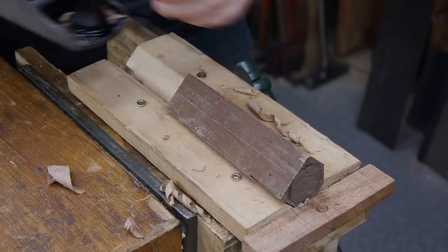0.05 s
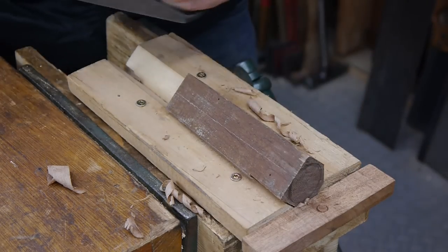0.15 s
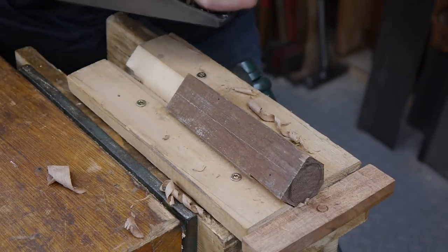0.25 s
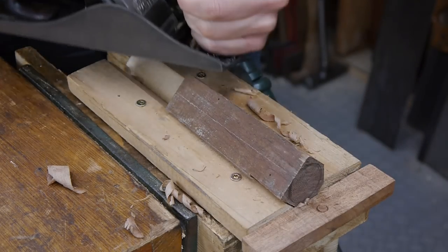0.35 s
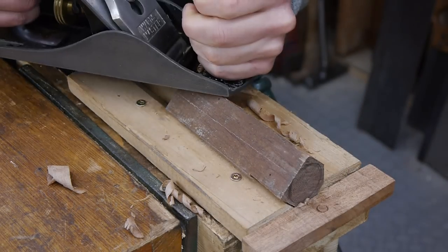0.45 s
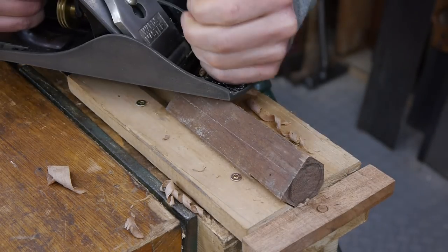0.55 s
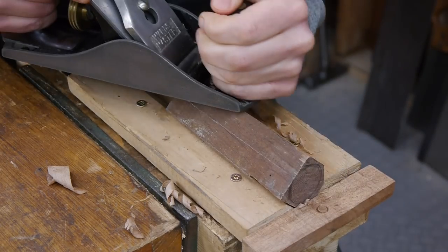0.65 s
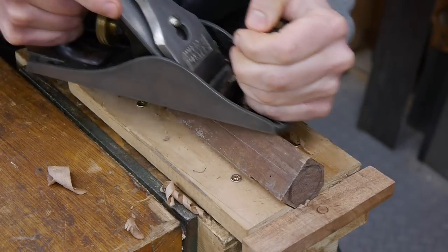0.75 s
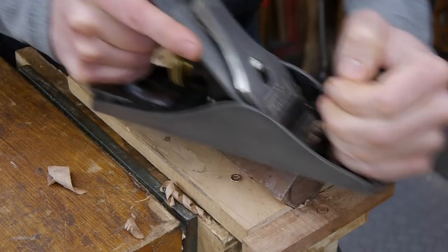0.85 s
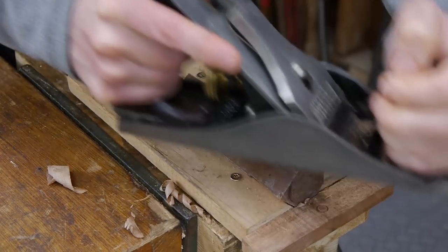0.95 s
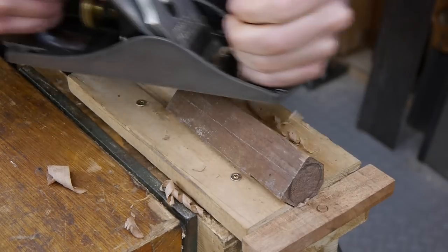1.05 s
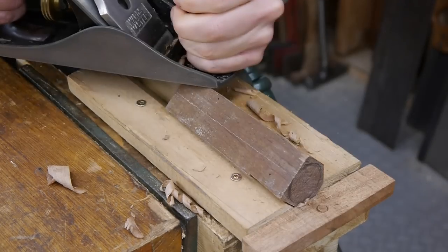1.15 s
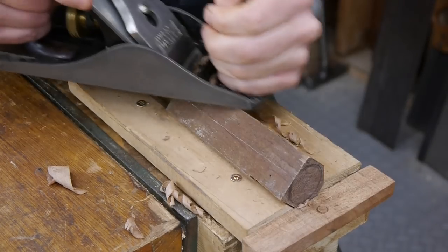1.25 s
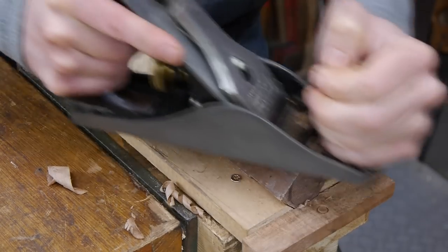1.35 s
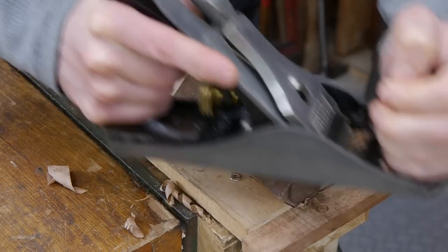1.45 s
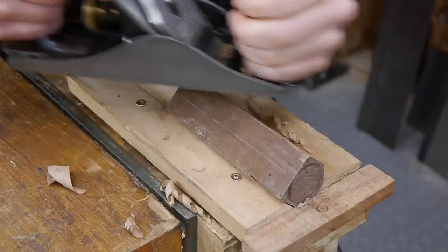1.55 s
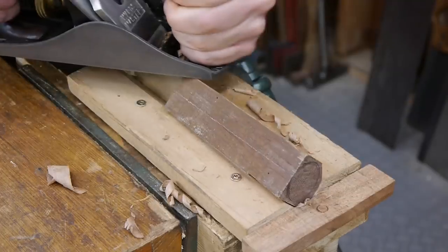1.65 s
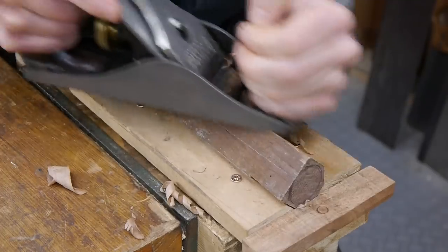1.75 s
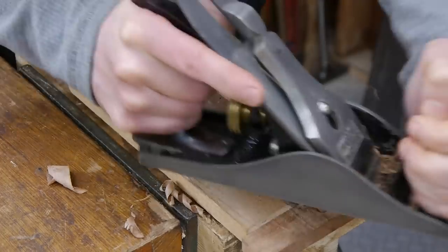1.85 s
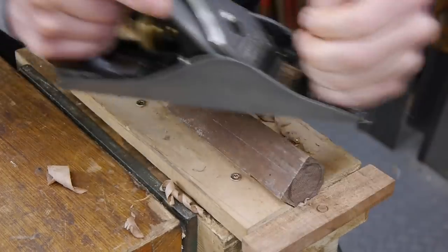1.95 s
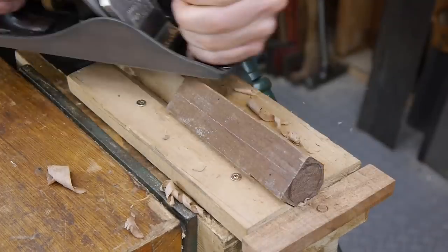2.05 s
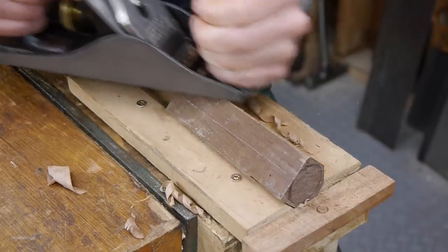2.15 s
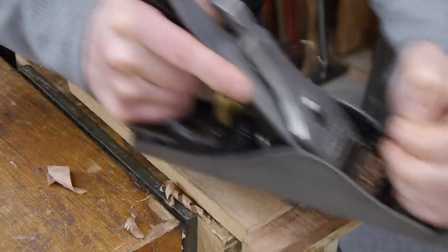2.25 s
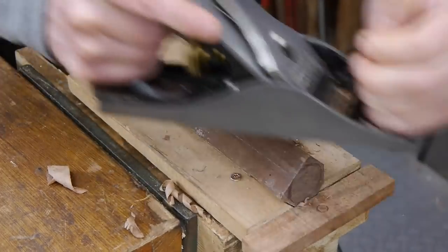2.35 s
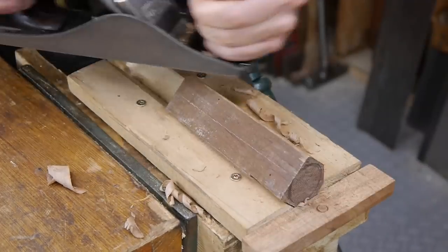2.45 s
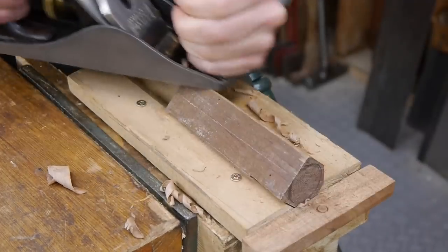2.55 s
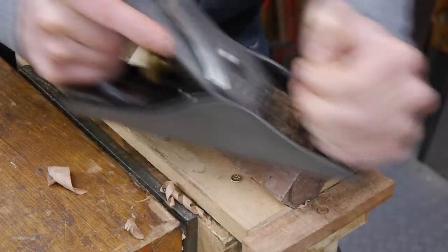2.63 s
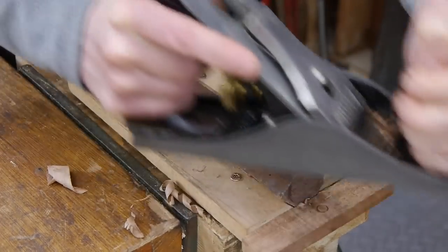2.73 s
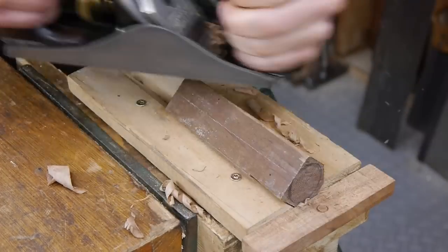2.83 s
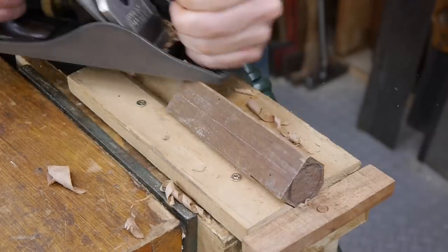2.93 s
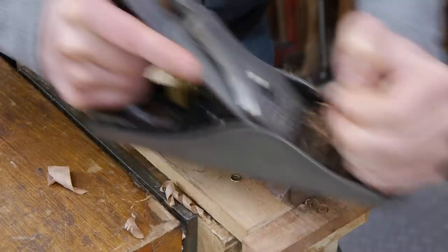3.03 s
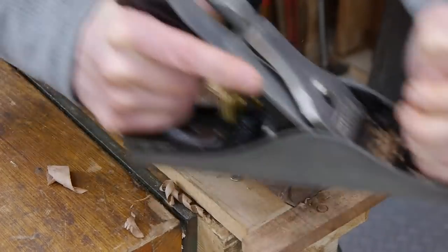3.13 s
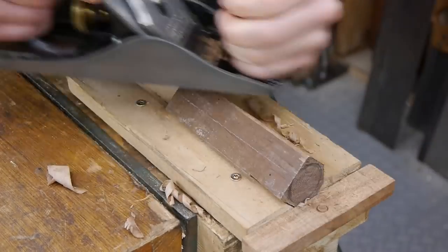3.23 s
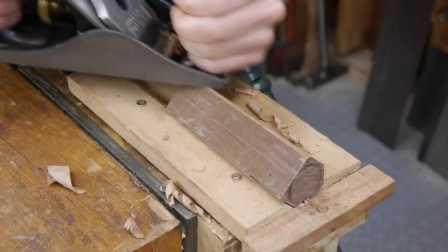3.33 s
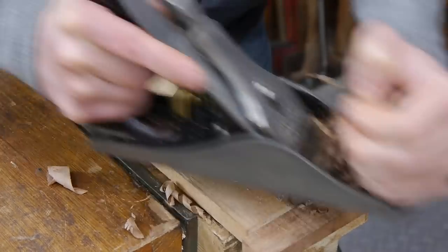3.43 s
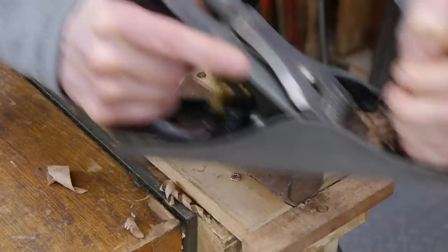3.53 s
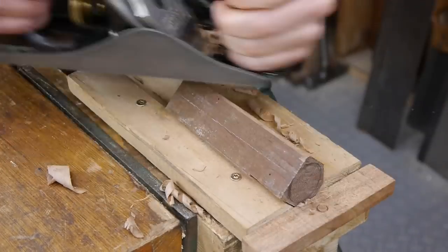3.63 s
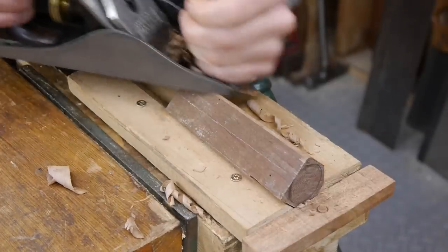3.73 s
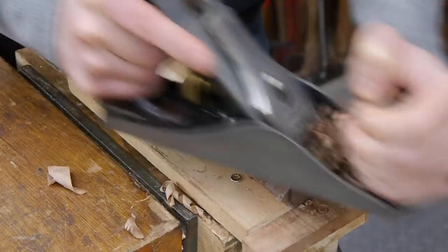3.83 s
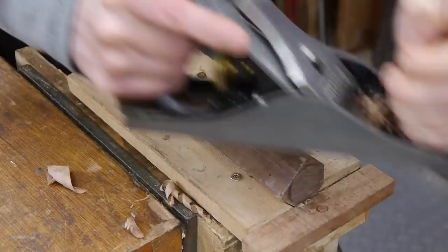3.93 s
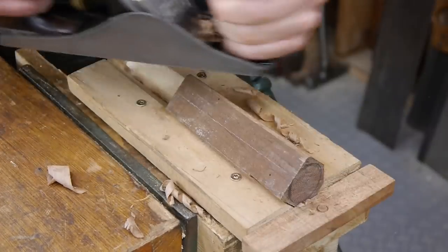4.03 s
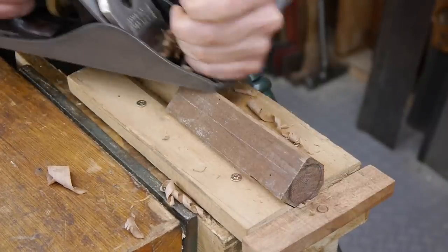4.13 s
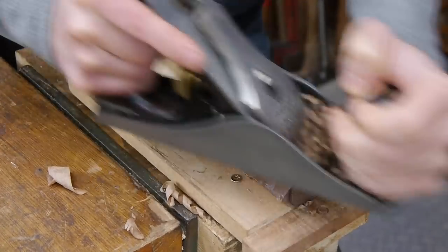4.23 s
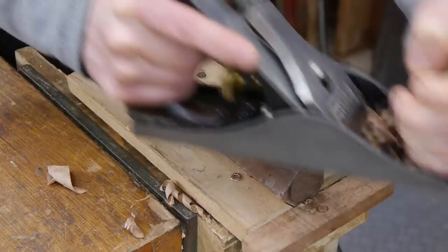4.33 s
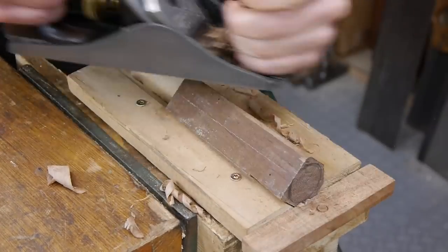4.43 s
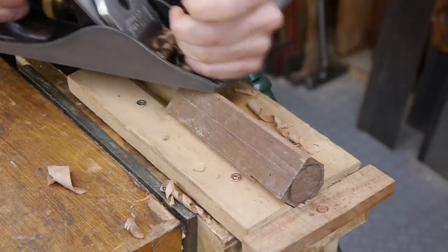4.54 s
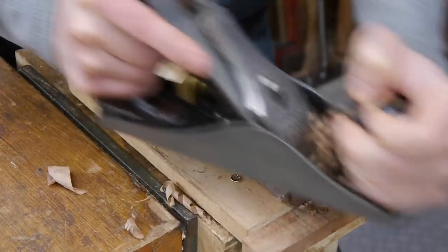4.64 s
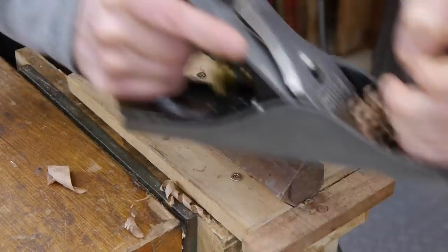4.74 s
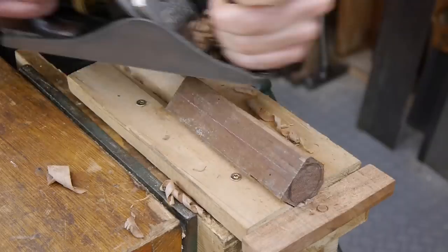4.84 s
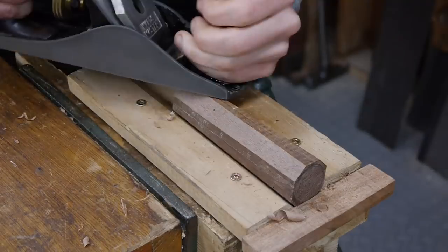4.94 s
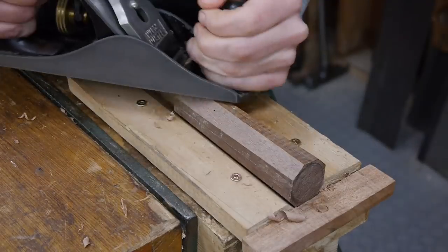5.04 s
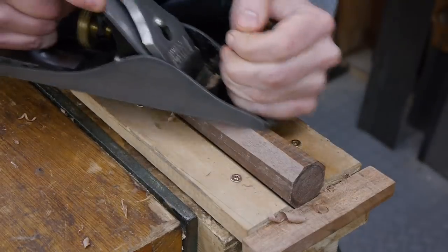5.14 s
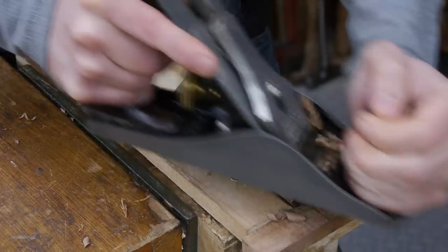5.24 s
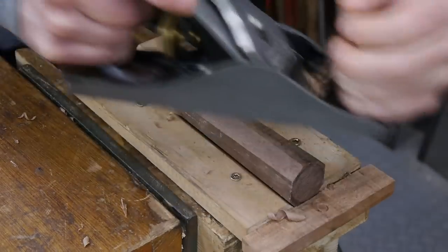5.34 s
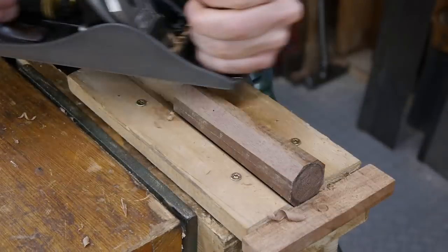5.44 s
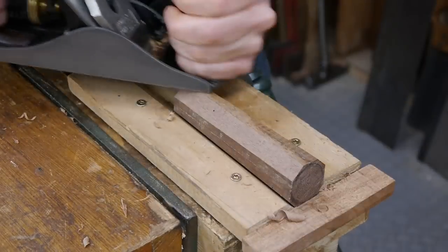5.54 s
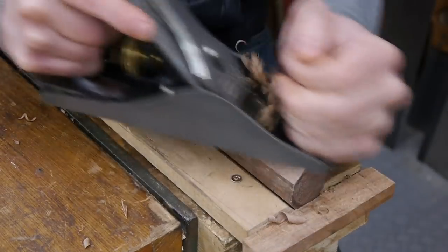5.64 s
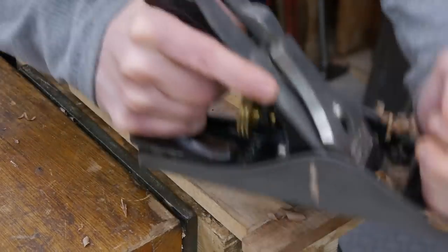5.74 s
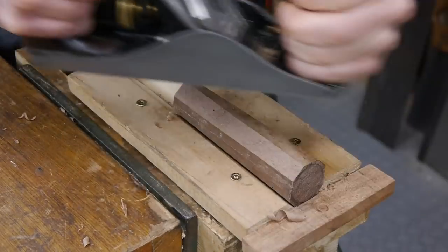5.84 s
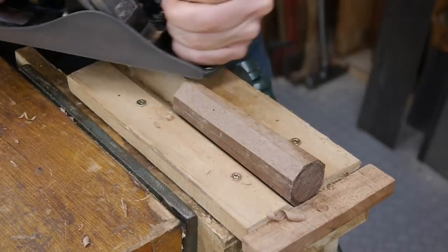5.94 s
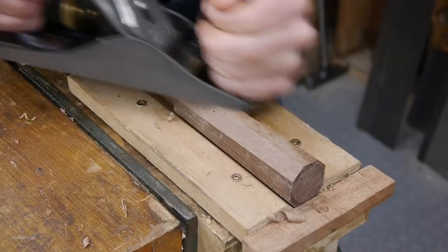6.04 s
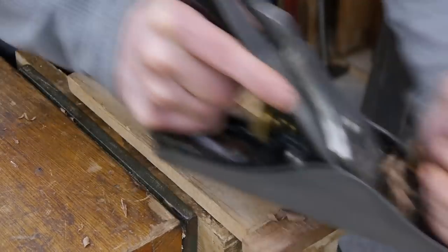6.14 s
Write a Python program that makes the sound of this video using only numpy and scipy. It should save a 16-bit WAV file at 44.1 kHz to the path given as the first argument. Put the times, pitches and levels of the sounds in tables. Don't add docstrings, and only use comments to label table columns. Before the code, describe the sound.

Quick hand-planing on hardwood: iron clack, light slide, hard knock, brief tearing scrape, then the blank rattles back into its wooden jig.

```python
import sys
import numpy as np
from scipy import signal
from scipy.fft import rfft, irfft, next_fast_len
from scipy.io import wavfile
from scipy.ndimage import uniform_filter1d

SR = 44100
rng = np.random.default_rng(int(sys.argv[2]) if len(sys.argv) > 2 else 0)


def level_to_linear(level):
    exponent = np.asarray(level, float) / 20
    return 10 ** exponent


def persist_wave(psi):
    counts = np.round(np.clip(psi, -1, 1) * 32767).astype(np.int16)
    wavfile.write(sys.argv[1], SR, np.atleast_2d(counts).T)


N = 272538


def at_hz(points, hz):
    point_hz, value = np.transpose(points)
    return np.interp(np.log(hz + 1e-9), np.log(point_hz), value)


def shaped(x, points):
    n = x.shape[-1]
    size = next_fast_len(n)
    gain = level_to_linear(at_hz(points, np.fft.rfftfreq(size, 1 / SR)))
    return irfft(rfft(x, size) * gain, size)[..., :n]


def drift(rate):
    steps = rng.standard_normal(4000)
    return np.interp(np.arange(N) / SR * rate, np.arange(len(steps)), steps)


# f/Hz, level/dB per Hz
AIR = [(12, -18), (20, -5), (48, -5), (86, -11.5), (660, -3), (718, -5.5), (849, -5.5), (3950, -13.5),
       (6720, -18), (13500, -14), (16000, -13.5)]
# f/Hz, side over mid level/dB
HUSH_SIDE = [(60, -5), (500, -11), (3000, -1)]
# t/s, level/dB
HUSH_SWELL = [(.25, 2), (.3, -1), (.42, 4), (.49, -2.5), (.62, 0), (.72, 3.7)]


def hush():
    noise = shaped(rng.standard_normal((2, N)), AIR)
    swell_db = np.interp(np.arange(N) / SR, *np.transpose(HUSH_SWELL))
    mid, side = noise / np.std(noise) * level_to_linear(-63 + 1.6 * drift(12) + swell_db)
    return mid, shaped(side, HUSH_SIDE)


# t/s, peak level/dB, thump level/dB, edge level/dB, brightness level/dB
JOLTS = [
    (0.224, -61, -5, 12, 9),
    (0.9146, -17.5, -44, -12, -25),
    (1.2218, -20.5, -10.5, -22, -22),
    (1.73, -7.5, -17.5, -16.5, -26),
    (1.8337, -16.5, -26, 2.5, -28.5),
]


def jolts():
    rattle_ms = 2.8
    return [(*row, rattle_ms) for row in JOLTS]


# t/s, peak level/dB, brightness level/dB, slide level/dB,
# slide hiss level/dB
LANDINGS = [(0.5104, -33.5, -13, -58, -81), (1.1781, -16, 0.5, -41, -63), (1.6859, -20, 7, -35, -60),
            (2.1449, -21, 7.5, -37, -58.5), (2.5723, -17.5, 4.7, -37.5, -55), (2.9601, -16, 3, -33, -49.5),
            (3.3591, -13.5, -2, -35.5, -50), (3.7485, -15.5, -0.5, -31.5, -52),
            (4.159, -11.5, 0.5, -35.5, -54.5), (4.567, -17, -1, -35.5, -50.5),
            (4.9762, -23, 20, -46.5, -64.5), (5.0711, -17, -10.5, -43, -63), (5.554, -19, -0.5, -39, -60),
            (6.0227, -15, 5.5, -38.5, -55.5)]
# thump level/dB, edge level/dB
FOOTINGS = [(-5.5, -2.5), (-16.5, 2.5), (-5.5, 9), (-2.5, 10), (-9, 5), (-9, 5.8), (-7.5, 5), (-8.5, 4),
            (-12, 5), (-6.5, 8.5), (-8.5, 3.5), (-5, -19), (-16.5, -3.5), (-10, 3.5)]


def landings():
    rattle_ms = 3.63
    return [(s, peak_db, *footing, bright_db, rattle_ms)
            for (s, peak_db, bright_db, *_), footing in zip(LANDINGS, FOOTINGS)]


def sliding():
    t, out = np.arange(N) / SR, np.zeros((3, N))
    stops = np.sort([row[0] for row in CUTS + LANDINGS])
    for s, _, _, slide_db, hiss_db in LANDINGS:
        start, stop = s + .012, stops[stops > s][0] + .006
        on = (t >= start) & (t < stop)
        skid_db = 13.5 * np.exp(-(t[on] - start) / .0061)
        run_up_db = 20.5 * np.exp((t[on] - stop) / .02)
        blank_db = slide_db + skid_db
        out[:, on] += level_to_linear([blank_db, blank_db - 7, hiss_db + .5 * skid_db + run_up_db])
    return out


def shudder():
    push = uniform_filter1d(cutting()[0] + rubbing()[0], size=900)
    low_pass = signal.butter(3, 100.7, fs=SR, output="sos")
    low = signal.sosfilt(low_pass, rng.standard_normal((2, N)))
    mid, side = low / np.std(low) * level_to_linear(-55.5 + 3.5 * drift(14)) * np.abs(push) ** 0.77
    return mid, level_to_linear(-10.5) * side


# t/s, length/s, scrape level/dB at entry, scrape level/dB at exit, hiss level/dB at exit
CUTS = [(0.703, 0.22, -38.5, -29, -37.5), (1.309, 0.12, -22, -20.5, -35.5), (1.781, 0.084, -20, -20, -28.5),
        (2.222, 0.062, -16, -22, -21.5), (2.645, .075, -31.5, -24.5, -26), (3.031, 0.078, -19, -28.5, -30),
        (3.428, 0.071, -21, -23.5, -25.5), (3.819, 0.081, -17, -18.5, -28), (4.227, 0.077, -15.5, -28, -26),
        (4.632, 0.076, -26, -21, -24.5), (5.139, 0.064, -31, -27, -34.5),
        (5.214, 0.093, -18.5, -18.5, -31.5), (5.644, .1, -23, -22, -27.5), (6.107, 0.077, -30, -14.5, -24)]
# hiss gain entry to exit/dB, rasp level/dB, rumble level/dB, attack/ms
SHAVINGS = [(21, -31, -44.5, 9), (7, -27.5, -38, 15.3), (8, -22, -40, 3.2), (9.5, -18, -38.5, 4.9),
            (6, -21.5, -39, 9.8), (-7, -26, -36.5, 7.6), (-1.5, -21.5, -41, 5.1), (-1.5, -23, -37, 7.8),
            (3.5, -19.5, -38, 9), (1, -21, -40.5, 7.2), (25, -30.5, -34.5, 6.7), (-4.5, -26, -36, 3.3),
            (3, -20, -35, 4.9), (2.5, -20.5, -34.5, 4)]
RELEASE_DB_PER_S = {"scrape": 503, "rumble": 397.5, "hiss": 559, "rasp": 691}


def cutting():
    t, out = np.arange(N) / SR, np.zeros((4, N))
    for cut, shaving in zip(CUTS, SHAVINGS):
        s, length, entry_db, exit_db, hiss_exit_db = cut
        gain_db, rasp_exit_db, rumble_db, attack_ms = shaving
        on = (t >= s) & (t < s + length + .2)
        age = t[on] - s
        done, after = np.clip(age / length, 0, 1), np.maximum(age - length, 0)
        entry_kick_db = 7 * np.exp(-age / .015)
        exit_kick_db = 11.5 * np.exp(-((age - length) / .0055) ** 2)
        arch_db = 2.5 * np.sin(np.pi * done)
        to_come_db = gain_db * (1 - done)
        scrape_db = entry_db + (exit_db - entry_db) * done
        bench_db = rumble_db + entry_kick_db + exit_kick_db
        hiss_db = hiss_exit_db - to_come_db + arch_db
        rasp_db = rasp_exit_db - 0.93 * to_come_db + arch_db
        attack = np.minimum(age * 1000 / attack_ms, 1)
        held_db = (scrape_db, bench_db, hiss_db, rasp_db)
        for k, (db, fall) in enumerate(zip(held_db, RELEASE_DB_PER_S.values())):
            out[k, on] += level_to_linear(db - fall * after) * attack
    return out


# t/s, length/s, f/Hz, level/dB
CHATTER = [
    (0.77, 0.038, 520, -27.5),
    (1.868, 0.0067, 1558, -4),
    (3.909, 0.012, 500, -24.5),
]


def chatter():
    t, wobble = np.arange(N) / SR, np.cumsum(1 + 0.013 * drift(130)) / SR
    out = np.zeros(N)
    for s, length, hz, db in CHATTER:
        swell = np.exp(-((t - s) / length * 2) ** 2)
        out += level_to_linear(db) * swell * np.sin(2 * np.pi * hz * wobble)
    return out


# t/s, peak level/dB, rocking level/dB
DROPS = [(0.9854, -19, -31), (1.502, -17, -34.5), (1.9305, -18.5, -32.5), (2.3558, -17.5, -35),
         (2.7706, -17, -33), (3.165, -12.5, -21.5), (3.5499, -7, -20), (3.962, -21, -29.5),
         (4.365, -18.5, -34), (4.7576, -11, -25.5), (5.3342, -15, -22.5), (5.7968, -8.5, -17.5)]


def drops():
    thump_db, edge_db, bright_db, rattle_ms = -25, -28, -26, 3.45
    return [(s, peak_db, thump_db, edge_db, bright_db, rattle_ms) for s, peak_db, _ in DROPS]


def rocking():
    t, out = np.arange(N) / SR, np.zeros((3, N))
    share_db = np.array([[0], [-9.5], [-26.5]])
    for s, _, rock_db in DROPS:
        on = (t >= s - .005) & (t < s + .2)
        out[:, on] += level_to_linear(rock_db - 322 * (t[on] - s) + share_db)
    return out


def rubbing():
    return uniform_filter1d(sliding() + rocking(), size=90, axis=1)


# t/s, peak level/dB, edge level/dB
BITES = [
    (2.228, -6.5, -23),
    (2.6568, -6, -2.5),
    (3.044, -10.5, -23),
    (3.4391, -10.5, -30),
    (3.8295, -10.5, 0.5),
    (4.2336, -14, -4.5),
    (4.6466, -9, 1.5),
    (5.215, -12.5, -7.5),
    (5.649, -7.5, -4),
    (6.111, -8.5, -9),
]


def bites():
    thump_db, bright_db, rattle_ms = -21.5, -17.5, 3.6
    return [(s, peak_db, thump_db, edge_db, bright_db, rattle_ms) for s, peak_db, edge_db in BITES]


def contacts():
    return landings() + bites() + drops() + jolts()


def blows(strength_db, stretch, click, brush_db):
    lead, size = round(.012 * SR), 1800
    out, t = np.zeros(N + size), (np.arange(size) - lead) / SR
    rattle = rng.standard_normal((len(strength_db), size))
    for (s, *_, rattle_ms), db, burst in zip(contacts(), strength_db, rattle):
        dying = np.exp(-np.maximum(t, 0) * 1000 / (stretch * rattle_ms))
        burst = burst * np.where(t < 0, level_to_linear(brush_db), dying) + click * (t == 0)
        start = round(s * SR) - lead
        out[start:start + size] += level_to_linear(db) * burst / np.sqrt(np.sum(burst ** 2))
    return out[:N]


def tearing(per_s, spread_db, clump_db):
    size_db = spread_db * np.minimum(rng.exponential(1, N), 3.5)
    sizes = level_to_linear(size_db) * rng.choice([-1, 1], N)
    snaps = sizes * (rng.random(N) < per_s / SR) * level_to_linear(clump_db * drift(160))
    return snaps / np.sqrt(np.mean(snaps ** 2))


def body(force, modes, between_db):
    out, power = np.zeros(N), 0
    for k, (hz, width_hz, db) in enumerate(modes):
        r = np.exp(-np.pi * width_hz / SR)
        fed = force * level_to_linear(db + 3.5 * drift(25)) + 1e-18
        poles = [1, -2 * r * np.cos(2 * np.pi * hz / SR), r * r]
        out += (-1) ** k * signal.lfilter([1 - r, 0, r - 1], poles, fed)
        power += level_to_linear(db) ** 2 * np.pi * width_hz / SR
    low_hz, top_hz = modes[0][0] * 0.66, min(modes[-1][0] * 1.176, .45 * SR)
    band = signal.butter(2, [low_hz, top_hz], "band", fs=SR, output="sos")
    out += level_to_linear(between_db) * signal.sosfilt(band, force + 1e-18)
    power += level_to_linear(between_db) ** 2 * 2 * (top_hz - low_hz) / SR
    soft = signal.butter(5, min(1.87 * top_hz, .46 * SR), fs=SR, output="sos")
    return signal.sosfilt(soft, out) / np.sqrt(power)


# f/Hz, width/Hz, level/dB
BENCH = [(197.4, 29, -21), (256, 35, -13), (287.7, 31, -7.5), (390.2, 42.2, -2.5), (520, 36.7, 0.5),
         (608.5, 51.5, -4.5), (777.5, 61, -7.5)]


def bench(push, thump_db):
    thumps = blows(thump_db + 25.5, stretch=2.1, click=3.3, brush_db=-48.5)
    return body(push + thumps, BENCH, between_db=-23.5)


# f/Hz, width/Hz, level/dB
BLANK = [(895, 15, 0.5), (1060, 209, 0), (1277, 150, -4), (1474.4, 77, 9.5), (1563.4, 41.6, 8.5),
         (1582, 40, 4), (1676, 118, 5.5), (1890, 20, 3), (1942, 43, -2)]


def blank(push, peak_db):
    knocks = blows(peak_db + 20.5, stretch=2.3, click=7.5, brush_db=-31.5)
    return body(push, BLANK, between_db=-8.5) + body(knocks, BLANK, between_db=-8.0)


# f/Hz, width/Hz, level/dB
SOLE = [(2330, 110, 2), (2456, 193, 6), (2781, 165, -5.5), (3364, 49, 3), (3392, 71, 0), (3850, 26, -0.5),
        (4160, 130, -19)]


def sole(push, edge_db):
    edges = blows(edge_db + 17.0, stretch=1.0, click=2.4, brush_db=-46.5)
    return body(push + edges, SOLE, between_db=-5.5)


# f/Hz, width/Hz, level/dB
IRON = [(4780, 300, -2), (5600, 400, -7), (6870, 300, -5), (8350, 400, 0), (10250, 450, -3),
        (12100, 600, -1), (13000, 500, -3), (14800, 900, -4)]


def iron(push):
    return body(push, IRON, between_db=-13.5)


# f/Hz, width/Hz, level/dB
CLACK = [(4500, 250, -9), (5000, 250, -8), (5390, 150, 2), (6770, 150, -8), (7090, 100, -9),
         (8270, 180, -4), (10500, 1000, -12), (13500, 1800, -16)]


def clack(bright_db):
    hits = blows(bright_db + 9.5, stretch=0.78, click=2.8, brush_db=-47.5)
    return body(hits, CLACK, between_db=-28.5)


def plane():
    scrape, rumble, hiss, rasp = cutting()
    rub, rub_low, rub_high = rubbing()
    _, peak_db, thump_db, edge_db, bright_db, _ = np.transpose(contacts())
    coarse = tearing(2500.0, spread_db=3.5, clump_db=3.0)
    rough = tearing(3500.0, spread_db=1.5, clump_db=0.5)
    fine = tearing(15000.0, spread_db=-5.0, clump_db=4.5)
    wood = bench((rumble + rub_low) * coarse, peak_db + thump_db) + blank((scrape + rub) * coarse, peak_db)
    metal = sole((rasp + level_to_linear(-17.0) * rub) * rough, peak_db + edge_db) + iron((hiss + rub_high) * fine)
    return wood + metal + clack(peak_db + bright_db) + chatter()


# f/Hz, T60/s
ROOM_T60 = [(150, 0.39), (500, 0.14), (1500, 0.21), (4000, 0.14), (12000, 0.12)]


def echoes(delay_s):
    t = np.arange(round(.45 * SR)) / SR
    white, out = rng.standard_normal(len(t)), np.zeros(len(t))
    for low_hz in 90 * 2.0 ** np.arange(8):
        band = signal.butter(2, [low_hz, min(2 * low_hz, .45 * SR)], "band", fs=SR, output="sos")
        out += signal.sosfilt(band, white) * level_to_linear(-60 * t / at_hz(ROOM_T60, 2.4 * low_hz))
    out = out * np.clip(t / delay_s - 1, 0, 1)
    return out / np.sqrt(np.sum(out ** 2))


# f/Hz, side over mid level/dB
SIDE_SHARE = [(120, -8), (300, -32), (700, -33), (1600, -18.5), (2800, -6), (8000, -7), (15000, -7.5)]


def room(dry):
    mid = dry + level_to_linear(-3.5) * signal.fftconvolve(dry, echoes(0.004))[:N]
    near = np.roll(dry, 9) - np.roll(dry, 31)
    side = level_to_linear(-17) * near + signal.fftconvolve(dry, echoes(.001))[:N]
    return mid, shaped(side, SIDE_SHARE)


def scene():
    no_deep_bass = signal.butter(5, 140, "high", fs=SR, output="sos")
    dry = signal.sosfilt(no_deep_bass, plane())
    mid, side = np.array(room(dry)) + np.array(hush()) + np.array(shudder())
    return np.array([mid + side, mid - side])


def band_limit(x):
    return signal.sosfilt(signal.butter(12, 16990, fs=SR, output="sos"), x)


def record(dry):
    low_pass = signal.cheby2(16, 40, 16200, fs=SR, output="sos")
    mix = signal.sosfilt(low_pass, dry)
    return band_limit(mix)


dry = scene()
out = record(dry)
persist_wave(out)
```